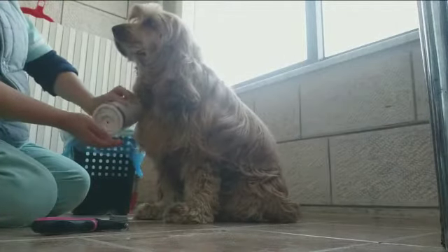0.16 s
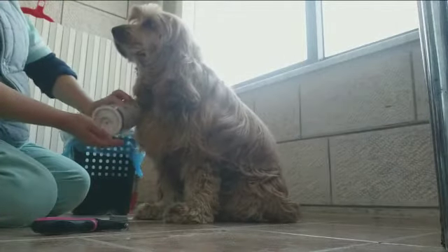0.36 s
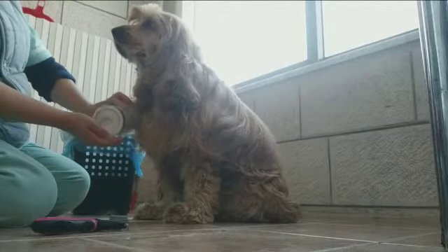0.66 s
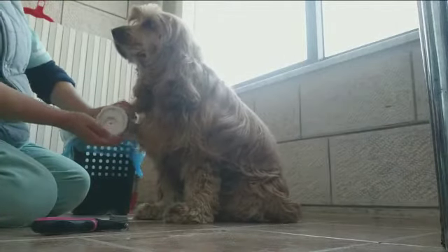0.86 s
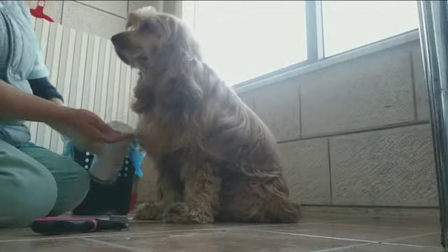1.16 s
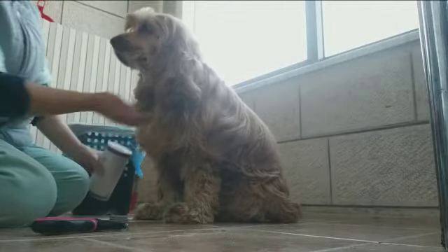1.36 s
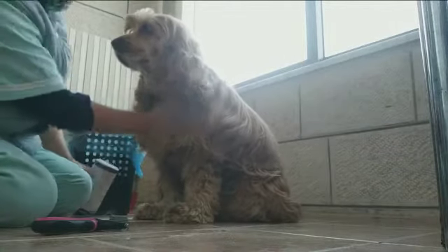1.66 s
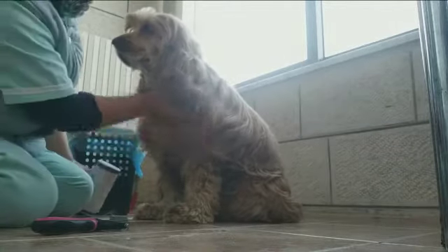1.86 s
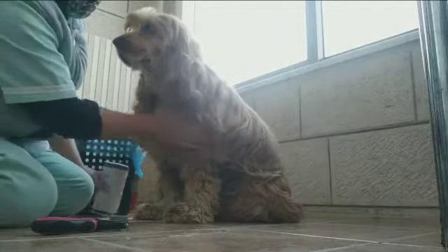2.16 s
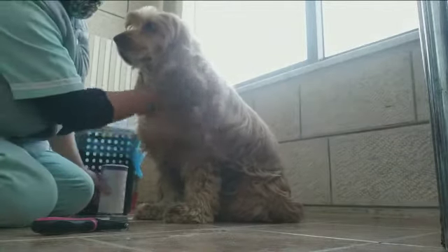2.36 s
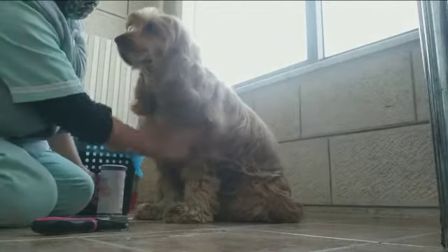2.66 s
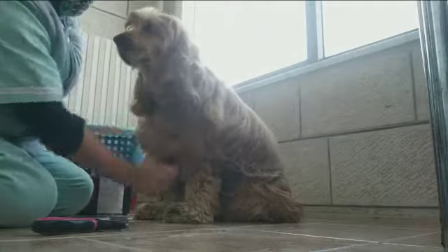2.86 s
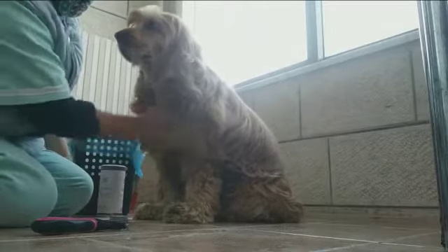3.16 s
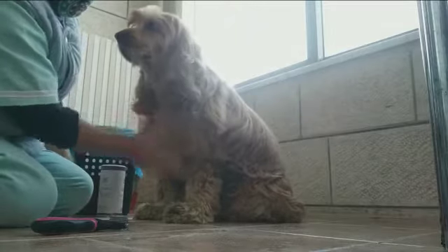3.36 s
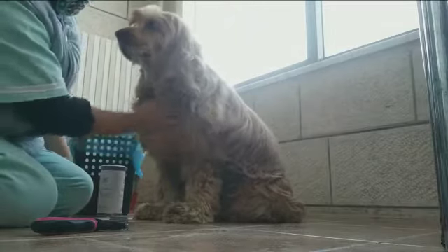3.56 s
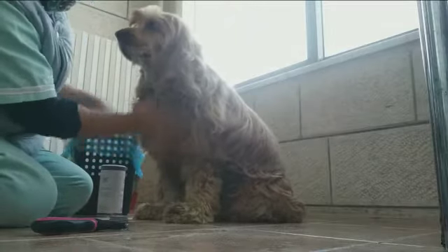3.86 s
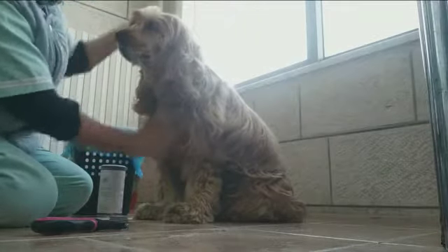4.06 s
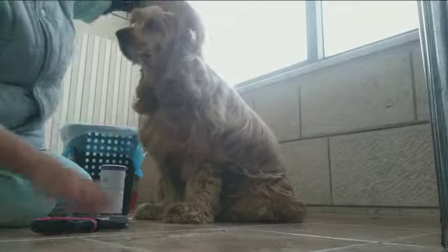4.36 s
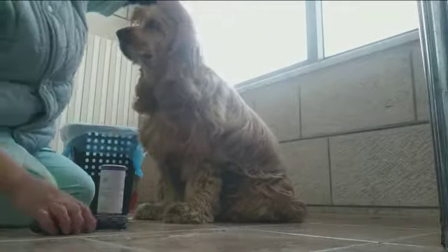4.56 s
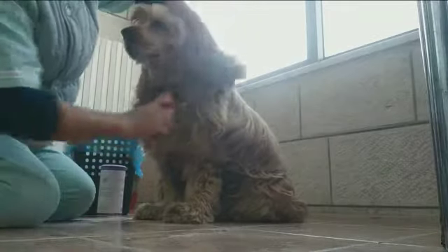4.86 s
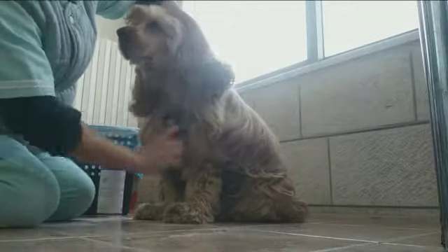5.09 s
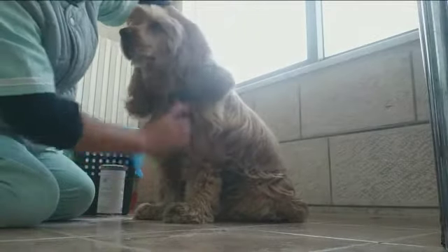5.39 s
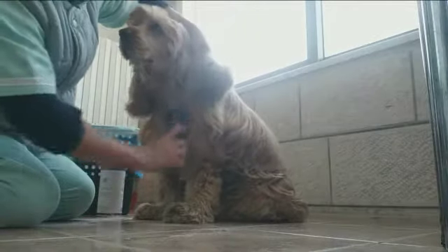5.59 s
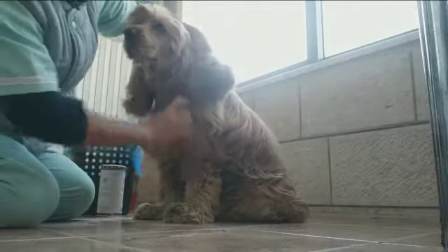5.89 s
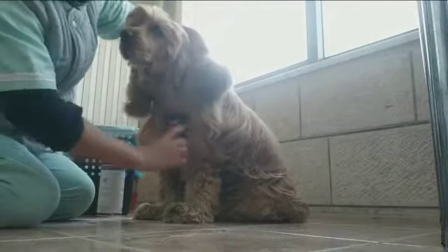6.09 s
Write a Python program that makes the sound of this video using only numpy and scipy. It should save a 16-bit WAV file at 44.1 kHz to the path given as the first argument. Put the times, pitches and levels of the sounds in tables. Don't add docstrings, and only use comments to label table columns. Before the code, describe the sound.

Quiet dog grooming, heard by a close microphone over a low distant engine hum. First come soft puffs of powder against a lid, then cloth rustle, then one strong hollow knock with quick bounces, by far the loudest event. Boomy bumps and friction follow, with smaller knocks. Later there are faint rubs, a brush picked up with a light clatter, and scratchy strokes through hair.

```python
import sys
import numpy as np
from scipy import signal
from scipy.fft import rfft, irfft, next_fast_len
from scipy.io import wavfile

SR = 44100
rng = np.random.default_rng(int(sys.argv[2]) if len(sys.argv) > 2 else 0)


def boost(x):
    u = np.asarray(x, float) / 20
    return 10 ** u


def wrap_up_sound(samples):
    columns = np.atleast_2d(samples).T
    tamed = np.clip(columns, -1, 1)
    steps = np.round(tamed * 32767).astype(np.int16)
    wavfile.write(sys.argv[1], SR, steps)


N = 274743
HZ = np.maximum(np.fft.rfftfreq(N, 1 / SR), 1)

# frequency_hz, density_db (per Hz)
ROOM_TONE = [(20, -23.5), (45, -20.5), (64, -13), (108, -4), (200, -12), (335, -13.5), (430, -25.5),
             (620, -40), (800, -25), (1000, -34), (1500, -18), (2000, -28), (2300, -30), (8000, -41.5)]
ROOM_TONE_DB = -73.5
# time_s, hum_db
TRAFFIC = [(0.0, -63), (0.56, -63.5), (0.85, -70.5), (1.18, -65.5), (1.5, -67), (2.8, -69.5), (3.3, -66),
           (3.46, -74), (3.7, -68), (4.11, -70.5), (4.7, -68.5), (4.93, -79), (5.7, -73.5), (6.23, -70)]
# time_s, wash_db
TYRES = [(0.0, -77.5), (1.1, -76.5), (1.6, -74), (3.7, -77.5), (4.5, -73), (4.95, -77), (6.23, -75.5)]
# frequency_hz, width_hz, level_db
TRAFFIC_MODES = [(104, 11.3, 2), (142.1, 31.5, 1), (246, 66, -12), (320, 24, -5.5)]

# start_s, peak_db, thud_db, decay_s
SHAKES = [
    (0.0194, -67, -81, 0.16),
    (0.2024, -68, -88, 0.21),
    (0.3965, -67.5, -72, 0.19),
    (0.5764, -69, -77, 0.12),
    (0.75, -64.5, -67.5, 0.18),
    (1.1787, -68, -73, 1),
]
# frequency_hz, width_hz, level_db
TUB = [(1840, 500, 0), (3800, 300, -10), (8400, 1100, 3)]

# peak_s, level_db, length_s, dull_rub_db, heavy_fold_db
RUSTLE = [(0.0, -71.5, 0.083, -8, -1.5), (0.208, -72, 0.073, -23, -24), (0.423, -91, 0.33, -12, 12.5),
          (0.582, -73, 0.14, -2.5, -3.5), (0.763, -94.5, 0.1, 16, 17), (1.202, -72.5, 0.17, -6, -16),
          (1.422, -58.5, 0.31, -5, -9.5), (1.501, -60.5, 0.16, -0.5, -6), (1.69, -69.5, 0.3, 0, -9),
          (2.62, -75.5, 0.65, -10, -18), (2.722, -81, 0.34, -1.5, -15), (2.882, -77, 0.15, 0, -15),
          (3.106, -73.5, 0.21, 0, 1), (3.224, -69.5, 0.14, -18, -20), (3.651, -70, 0.18, -8.5, -6.5),
          (3.826, -94.5, 0.17, 20, 17.5), (4.05, -75.5, 0.32, -6, -13), (4.213, -71.5, 0.82, -1.5, -7),
          (4.332, -75, 0.34, 2, -13), (4.444, -72, 0.1, 0, -13), (5.69, -85.5, 0.37, 5.5, 6),
          (6.057, -81.5, 0.29, 5.5, -3)]
# frequency_hz, density_db (per Hz)
CLOTH = [(1500, -22), (2500, -11.5), (3100, -9), (3700, -6), (4500, -9.5), (5800, -11), (7200, -10),
         (8500, -8.5), (10000, -15.5), (15500, -14)]
# frequency_hz, density_db (per Hz)
RUB = [(900, -32), (1400, 0.5), (1900, 2.5), (2250, -1), (2600, 0.5), (3000, -15.5), (4500, -36)]
RUSTLE_RISE, RUSTLE_ROUND = 0.63, 1.23

# start_s, peak_db,
# pitch_hz, rise_s, decay_s
TOUCHES = [(0.001, -66, 297, 0.033, 0.34), (0.202, -61.5, 320, 0.012, 0.16), (0.218, -63, 212, 0.016, 0.5),
           (0.2, -63.5, 269, 0.019, 0.19), (0.577, -61.5, 1950, .001, 0.067),
           (0.59, -59.5, 286, 0.0062, 0.16), (0.61, -60, 225, 0.012, 0.18),
           (1.185, -68, 4060, 0.0049, 0.15), (1.4, -60, 2290, .04, .4), (1.44, -62, 5200, 0.035, .3),
           (1.83, -64.5, 1950, 0.024, 0.46), (1.959, -60, 1840, 0.031, 0.39),
           (2.19, -52, 2680, .006, 0.071), (2.194, -50, 2160, .004, .06), (2.42, -53.5, 1310, .01, 0.24),
           (2.5, -62, 896, 0.023, 0.28), (3.063, -64, 806, 0.035, 0.31), (3.202, -77, 3430, 0.014, .1),
           (3.632, -75, 3600, 0.015, 0.078), (3.812, -80, 2030, 0.0018, 0.12)]
# start_s, peak_db, pitch_hz, rise_s, decay_s
BRUSH_TOUCHES = [(4.19, -62.5, 2030, 0.025, .35), (4.26, -73, 8150, .04, .5), (4.29, -70, 2020, .025, .25),
                 (4.335, -65, 1820, .015, .2), (4.42, -71, 12100, .02, 0.26),
                 (4.476, -68, 1200, 0.0095, .3), (4.546, -59.5, 1870, 0.016, .16),
                 (4.634, -63, 14300, .002, .2), (5.035, -61.5, 4360, 0.0089, 0.24),
                 (5.12, -66, 3500, 0.02, 0.18), (5.545, -58.5, 6600, 0.0061, 0.16),
                 (5.6, -61, 3500, .01, .12), (5.66, -41, 6470, 0.00083, 0.023),
                 (5.69, -64, 1400, 0.018, .3), (5.775, -64, 8400, 0.0082, 0.088),
                 (6.012, -74, 5160, 0.007, .12), (6.016, -62, 8100, .006, .1), (6.04, -63, 6900, .03, .3)]

# start_s, peak_db, crack_db, sharp_edge_db
KNOCKS = [
    (1.703, -22.5, -29, -36),
    (1.718, -16.5, -40, -39),
    (1.735, -21, -42, -55),
    (1.741, -24, -85, -46),
    (1.748, -38, -55, -64),
    (2.164, -56, -54, -54),
    (2.193, -34, -67, -65),
    (2.356, -58, -54, -73),
    (2.392, -34.5, -37.5, -60),
    (2.406, -31, -64, -83),
]
# frequency_hz, density_db (per Hz)
KNOCK_COLOUR = [(40, -45), (70, -16), (140, -9.5), (250, -9), (400, -10.5), (600, -5), (1000, -11),
                (1300, -29), (1900, -21.5), (2500, -26), (4200, -38.5), (5500, -42.5), (11000, -45),
                (16000, -47)]
# frequency_hz, t60_s
KNOCK_TAIL = [(80, 1), (250, 0.5), (700, 0.35), (2000, 0.21), (6000, 0.25), (14000, 0.072)]
# frequency_hz, width_hz, level_db
KNUCKLE = [(723, 166, -1.5), (2076, 420, -9), (3750, 400, -18)]
KNUCKLE_CUT_HZ = 3800

# start_s, peak_db, pitch_hz
BUMPS = [(1.7595, -37, 750), (1.772, -42, 694), (1.778, -35, 480), (1.796, -44, 590), (1.807, -42, 694),
         (1.826, -39, 600), (1.84, -47, 248), (1.885, -50, 199), (1.917, -45, 216), (1.945, -43, 217),
         (1.975, -41, 230), (1.965, -40, 215), (1.993, -41.5, 215), (2.004, -34, 219), (2.034, -45, 213),
         (2.049, -35.5, 213), (2.066, -42, 230), (2.088, -34.5, 203), (2.098, -45, 215), (2.113, -47, 178),
         (2.125, -45.5, 190), (2.14, -38, 257), (2.162, -33.5, 200), (2.184, -34, 215), (2.193, -31.5, 238),
         (2.205, -29, 232), (2.214, -35, 207), (2.234, -33, 238), (2.248, -29.5, 201), (2.264, -36.5, 242),
         (2.284, -44, 215), (2.304, -38, 201), (2.319, -38, 217), (2.341, -38, 189), (2.37, -44, 213),
         (2.386, -39, 214), (2.407, -34, 790), (2.418, -48, 500), (2.436, -40, 400)]
BUMP_CYCLES, BUMP_SOFTNESS = 9.7, 0.9

# time_s, boom_db
DRAG = [(1.78, -64), (1.85, -44.5), (1.98, -42.5), (2.12, -43.5), (2.206, -37), (2.31, -42), (2.45, -43),
        (2.6, -61), (2.9, -80)]
# peak_s, body_db, rattle_db, rise_s, fall_s
JERKS = [(1.779, -48.5, -67, .03, 0.2), (1.986, -52, -87, 0.041, 0.22), (2.2, -45.5, -50.5, 0.072, 0.1),
         (2.243, -46, -58.5, 0.12, 0.12), (2.36, -68, -70, .02, .05), (2.411, -47, -62.5, 0.058, 0.15),
         (2.04, -54, -70, 0.05, 0.16), (2.11, -67, -64.5, 0.072, 0.18)]
# frequency_hz, width_hz, level_db
PANEL = [(104, 44, -13.5), (135.4, 8.5, 1), (179.7, 25, -3.5), (212, 34, 2), (246, 88, -0.5),
         (459, 35.5, -0.5), (494, 93, -5.5), (619, 32, -8), (730, 67, -7.5), (858, 51, -8.5),
         (970, 26, -8.5)]
# frequency_hz, width_hz, level_db
RUNNER = [(1680, 110, 6), (2060, 260, 6.5), (2200, 250, 8), (2610, 150, 9), (2760, 280, 2), (3110, 130, 4)]
# frequency_hz, density_db (per Hz)
SCRAPE = [(1940, -34), (3300, -9), (3900, 0), (4620, -8), (5340, -2), (6500, -3), (7500, -4.5), (8590, -6),
          (12400, -10), (14000, -19)]
BODY_DB, RATTLE_DB, SCRAPE_DB = -13.5, -31.5, -35.5
JERK_BOOM_DB, JERK_SCRAPE_DB = -1, -8.5
EASY_DB, HARDER = -37, 2
MURMUR_DB = -6

# peak_s, level_db, handle_db (against the level)
LIFTS = [
    (4.479, -62.5, 0),
    (4.556, -51, -1),
]
# landing_s, landing_db, hardest_pull_s, pull_db, let_go_s
STROKES = [
    (5.037, -58, 5.185, -56.5, 0.1),
    (5.55, -60.5, 5.62, -58.5, 0.16),
    (5.6, -69, 5.685, -64, 0.15),
    (5.76, -69, 5.79, -86, 0.092),
    (6.02, -56, 6.145, -58.5, .11),
]
# start_s, peak_db, pins_db, thud_db, frame_db
TICKS = [(4.473, -67, -48, -56, -62), (4.4982, -70, -48, -61, -65.5), (4.5437, -48, -44, -59, -62),
         (4.564, -41, -59, -61, -71), (5.147, -50.5, -55, -88, -85), (5.198, -61, -44, -76, -86),
         (5.659, -46.5, -48, -69.5, -83), (4.556, -50, -49, -75, -68), (4.578, -53, -56, -75, -72),
         (5.121, -70, -52, -85, -85), (5.165, -70, -59, -87, -85), (5.177, -70, -61, -85, -87),
         (5.21, -72, -55, -88, -85), (5.238, -63, -65, -88, -91), (5.6, -63, -52, -83, -83),
         (5.617, -52, -54, -82, -85), (6.096, -70, -51, -85, -85), (6.133, -58, -57, -85, -87),
         (6.15, -61, -61, -85, -91)]
# start_s, peak_db, decay_s
SWISH = [
    (4.633, -58, 0.31),
    (4.67, -61, .2),
    (5.66, -55, .03),
]
# frequency_hz, width_hz, level_db
HANDLE = [(1196, 130, -8), (1842, 54, 4.5), (1945, 105, 0.5), (2080, 170, -3)]
# frequency_hz, width_hz, level_db
PINS = [(3480, 170, -15), (5200, 250, -13), (6470, 120, -5), (6900, 260, -7), (7750, 160, -11),
        (8940, 280, -11), (10250, 170, -11), (11000, 150, -13), (11950, 160, -4), (12280, 150, 0),
        (12600, 160, -10), (12950, 200, -15), (14200, 120, -16)]
# frequency_hz, width_hz, level_db
FRAME = [(1200, 36, 7), (2830, 71, 4), (3500, 220, -11), (4270, 300, -2.5), (5140, 100, 7.5),
         (5400, 220, -8), (5800, 150, -6), (6450, 180, -6), (7760, 200, -2), (8340, 150, -1),
         (9600, 200, -6)]
# frequency_hz, density_db (per Hz)
HAIR = [(1500, -40), (2600, -11), (3500, -13), (4400, -8), (5800, -4.5), (6900, -4.5), (7400, -4),
        (9500, -4.5), (12800, 0.5), (13600, -19), (15500, -8)]
LANDING_RISE_S, LANDING_FALL_S, PULL_RISE_S = 0.039, 0.16, 0.19
PULL_HANDLE_DB, PULL_HAIR_DB, HAIR_LINGERS = -5.5, -4, 1.2
LANDING_PINS_DB = -5.5
LIFT_RISE_S, LIFT_HANDLE_S, LIFT_PINS_S, LIFT_HAIR_S = 0.035, 0.14, 0.11, 0.25

ROOM_T60_S, ROOM_DB = 0.21, -14.5
# frequency_hz, width_hz, level_db
HOUSING = [(1950, 370, -41), (2200, 1000, -15)]
# frequency_hz, width_hz, level_db (each pass)
LEFT_PORT = [(9530, 1800, -4)]
# frequency_hz, width_hz, level_db (each pass)
RIGHT_PORT = [(1880, 640, -0.63)]
HISS_DB, CUTOFF_HZ = -78, 15780


def rms_one(x):
    return x / np.sqrt(np.mean(x ** 2) + 1e-20)


def in_time(rows):
    s, db = np.transpose(rows)
    return np.interp(np.arange(N) / SR, s, db)


def at_hz(points, hz):
    table_hz, values = np.array(points).T
    return np.interp(np.log(hz), np.log(table_hz), values)


def colour(x, spectrum):
    return rms_one(irfft(rfft(x) * boost(at_hz(spectrum, HZ)), N))


def band_of(x, low_hz, high_hz):
    return signal.sosfilt(signal.butter(2, [low_hz, high_hz], "band", fs=SR, output="sos"), x)


def drift(rate):
    r = np.exp(-2 * np.pi * rate / SR)
    white = rng.standard_normal(N + SR)
    return rms_one(signal.lfilter([1], [1, -2 * r, r * r], white)[SR:])


def grains(per_s, spread_db):
    sizes = boost(spread_db * np.minimum(rng.exponential(1, N), 5)) * rng.choice([-1, 1], N)
    return sizes * (rng.random(N) < per_s / SR) + 1e-18


def resonate(x, modes):
    out = 0
    for k, (hz, width, db) in enumerate(modes):
        r = np.exp(-np.pi * width / SR)
        top = (1 - r * r) / 2
        poles = [1, -2 * r * np.cos(2 * np.pi * hz / SR), r * r]
        out = out + (-1) ** k * boost(db) * signal.lfilter([top, 0, -top], poles, x)
    return out


def dying(times, dbs, t60, rise=0.00054):
    power = np.full(N, 1e-18)
    power[(np.array(times) * SR).astype(int)] = boost(2 * np.array(dbs))
    for pole in (boost(-120 / (t60 * SR)), np.exp(-1 / (rise * SR))):
        power = signal.lfilter([1], [1, -pole], power)
    return np.sqrt(power / (1 + rise * SR))


def swell(s, db, rise, fall, roundness=0.66):
    t = np.arange(0, N + 32, 32)[:, None] / SR - s
    far = np.where(t < 0, -t / rise, t / fall) ** roundness
    power = boost(np.maximum(2 * (db - 30 * far), -400))
    gain = np.sqrt(np.sum(power, axis=1))
    return np.interp(np.arange(N) / 32, np.arange(len(gain)), gain)


def patchy(x, patch_db, rate):
    edges = 1500 * 2 ** np.arange(0, 3.7, 1 / 3)
    out = 0
    for k, (low, high) in enumerate(zip(edges, edges[1:])):
        out = out + (-1) ** k * band_of(x, low, high) * boost(patch_db * drift(rate))
    return rms_one(out)


def struck(force, modes):
    plucks = grains(6000, 2.5)
    rung = 0
    for k, mode in enumerate(modes):
        rung = rung + (-1) ** k * resonate(force * plucks * boost(2.2 * drift(14)), [mode])
    return rung / np.std(resonate(plucks, modes))


def background():
    hiss = boost(ROOM_TONE_DB + 3.5) * colour(rng.standard_normal(N), ROOM_TONE)
    hiss = hiss - resonate(hiss, [(630, 450, -3)])
    hum = rms_one(resonate(resonate(rng.standard_normal(N), TRAFFIC_MODES), TRAFFIC_MODES))
    wash_spectrum = [(250, -12.0), (430, -3.0), (700, -4.5), (1000, -1.0), (1300, -6.0), (2500, -47)]
    wash = colour(rng.standard_normal(N), wash_spectrum)
    wander = boost(0.91 * drift(0.92) + 0.97 * drift(6.9))
    return hiss + boost(in_time(TRAFFIC)) * wander * hum + boost(in_time(TYRES)) * wash


def powder_tub():
    fine = rms_one(resonate(grains(6000, 2.3), TUB[1:]))
    thud = rms_one(resonate(grains(1600, 2.5), TUB[:1]))
    out = 0
    for s, db, thud_db, t60 in SHAKES:
        out = out + dying([s], [db - 4.5], t60, rise=0.012) * fine
        out = out + dying([s], [thud_db - 4], 0.069) * thud
    return out


def rustle():
    s, db, length, dull_db, fold_db = np.transpose(RUSTLE)
    bright, dull, fold = (swell(s, db + against_db, RUSTLE_RISE * length, length, RUSTLE_ROUND)
                          for against_db in (0, dull_db, fold_db))
    fibres = colour(grains(9000, 0.52), CLOTH)
    rub = grains(8000, 3.2)
    folds = colour(rub, [(400, -43), (700, 1.0), (1000, 4.0), (1300, -3.5), (1800, -51.0)])
    return bright * fibres + dull * colour(rub, RUB) + fold * folds


def touches():
    white = rng.standard_normal(N)
    out = 0
    for s, db, hz, rise, t60 in TOUCHES + BRUSH_TOUCHES:
        out = out + dying([s], [db - 1.5], t60, rise) * rms_one(resonate(white, [(hz, 0.074 * hz, 0)]))
    return out


def knocks():
    s, db, crack_db, edge_db = np.transpose(KNOCKS)
    white = rng.standard_normal((2, N))
    edges = 60 * 2 ** np.arange(0, 8.1, 1 / 3)
    out = 0
    for k, (low, high) in enumerate(zip(edges, edges[1:])):
        hz = np.sqrt(low * high)
        strength = db if hz < 1200 else crack_db + 19 if hz < 5000 else edge_db + 27.5
        level_db = strength + at_hz(KNOCK_COLOUR, hz) + 6
        envelope = dying(s, level_db, at_hz(KNOCK_TAIL, hz), rise=0.00058 + 0.23 / hz)
        out = out + band_of(white[k % 2], low, high) * envelope
    soften = signal.butter(2, KNUCKLE_CUT_HZ, fs=SR, output="sos")
    for mode, strength in zip(KNUCKLE, (db + 34, crack_db + 43.0, crack_db + 40.0)):
        clicks = np.full(N, 1e-18)
        clicks[((s + .0016) * SR).astype(int)] = boost(strength)
        soft = signal.sosfilt(soften, clicks)
        out = out + resonate(resonate(soft, [mode]), [(mode[0], 3 * mode[1], 0)])
    return out


def bumps():
    out = np.zeros(N)
    for s, db, hz in BUMPS:
        cycles = np.arange(int(.12 * SR)) * hz / SR
        decay = boost(db + 9.5 - 60 * cycles / BUMP_CYCLES)
        contact = 1 - np.exp(-cycles / BUMP_SOFTNESS)
        start = int(s * SR)
        out[start:start + len(cycles)] += decay * contact * np.sin(2 * np.pi * cycles)
    return out


def drag_forces():
    before, after = (DRAG[0][0] - .06, -120), (DRAG[-1][0] + .1, -120)
    effort_db = in_time([before] + DRAG + [after])
    upper_db = EASY_DB + HARDER * (effort_db - EASY_DB)
    s, body_db, rattle_db, rise, fall = np.transpose(JERKS)
    layers = [(effort_db, body_db + JERK_BOOM_DB),
              (upper_db + BODY_DB, body_db),
              (upper_db + RATTLE_DB, rattle_db),
              (upper_db + SCRAPE_DB, rattle_db + JERK_SCRAPE_DB)]
    return [np.hypot(boost(steady_db), swell(s, jerk_db, rise, fall, 1.29)) for steady_db, jerk_db in layers]


def drag():
    boom, body, rattle, scrape = drag_forces()
    slips = grains(700, 2.6)
    low = rms_one(resonate(resonate(slips, PANEL[:5]), [(198, 250, 0)]))
    finer_slips = slips + 1.56 * grains(1600, 2.66)
    mid = rms_one(resonate(resonate(finer_slips, PANEL[5:]), [(810, 2000, 0)]))
    grit = grains(3000, 2.3)
    runner = rms_one(resonate(resonate(grit, RUNNER), [(2480, 1400, 0)]))
    scraping = patchy(colour(grit, SCRAPE), patch_db=2.4, rate=40)
    return boost(MURMUR_DB) * boom * low + body * mid + rattle * runner + scrape * scraping


def brush_forces():
    lands, land_db, pull, pull_db, let_go = np.transpose(STROKES)
    s, db, handle_db = np.transpose(LIFTS)
    in_coat = np.minimum(swell(lands, 0, LANDING_RISE_S, .4, 6), 1)
    landing = swell(lands, land_db, LANDING_RISE_S, LANDING_FALL_S, 0.99)
    handle_pull = swell(pull, pull_db + PULL_HANDLE_DB, 0.9 * PULL_RISE_S, let_go, 1.25)
    pins_pull = swell(pull, pull_db, PULL_RISE_S, let_go, 0.9)
    hair_pull = swell(pull, pull_db + PULL_HAIR_DB, 1.1 * PULL_RISE_S, HAIR_LINGERS * let_go, 1.44)
    handle = np.hypot(in_coat * handle_pull, swell(s, db + handle_db, LIFT_RISE_S, LIFT_HANDLE_S))
    pins = np.hypot(in_coat * pins_pull, swell(s, db, LIFT_RISE_S, LIFT_PINS_S))
    hair = np.hypot(in_coat * hair_pull, swell(s, db, LIFT_RISE_S, LIFT_HAIR_S))
    return handle, np.hypot(pins, boost(LANDING_PINS_DB) * landing), np.hypot(hair, landing)


def loose_hair():
    thin_spectrum = [(5000, -26), (9000, -13), (12500, -7), (14000, -8), (16000, -3)]
    thin = colour(rng.standard_normal(N), thin_spectrum)
    return sum(dying([s], [db], t60, rise=.003) for s, db, t60 in SWISH) * thin


def brush():
    handle, pins, hair = brush_forces()
    s, db, pins_db, thud_db, frame_db = np.transpose(TICKS)
    handle = np.hypot(handle, dying(s, db - 1.0, 0.016))
    pins = np.hypot(pins * boost(-1.5), dying(s, pins_db - 5.5, 0.027))
    hair = np.hypot(hair * boost(-1.0), dying(s, pins_db - 19, 0.0091))
    frame = dying(s, frame_db + 4.0, 0.18, rise=.003)
    ringing = struck(handle, HANDLE) + struck(pins, PINS) + struck(frame, FRAME)
    thud = struck(dying(s, thud_db - 6.0, 0.36, rise=0.0047), [(273, 33, 1.5), (656, 260, -7)])
    hissing = patchy(colour(grains(16000, 2.9), HAIR), patch_db=2.6, rate=52)
    return ringing + thud + hair * hissing + loose_hair()


def tiles(x):
    size = next_fast_len(N + SR)
    hz = np.fft.rfftfreq(size, 1 / SR)[:, None]
    delays_s = rng.uniform(.009, .028, 8)
    loop = np.exp(-2j * np.pi * hz * delays_s) * boost(-60 * 0.024 / ROOM_T60_S)
    echoes = np.sum(loop / (1 - loop), axis=1)
    return irfft(rfft(x, size) * echoes, size)[:N]


def scene():
    near = powder_tub() + rustle() + touches() + knocks() + bumps() + drag() + brush()
    field = background() + near + boost(ROOM_DB) * tiles(near)
    field = field + resonate(field, HOUSING)
    return np.array([field + resonate(resonate(field, port), port) for port in (LEFT_PORT, RIGHT_PORT)])


def band_limit(x):
    return signal.sosfilt(signal.butter(12, 16320, fs=SR, output="sos"), x)


def record(dry):
    rounded = .12 * np.tanh(dry / .12)
    wet = rounded + boost(HISS_DB) * rng.standard_normal(dry.shape)
    wet = signal.sosfilt(signal.cheby2(16, 50, CUTOFF_HZ, fs=SR, output="sos"), wet)
    return band_limit(wet)


dry = scene()
out = record(dry)
wrap_up_sound(out)
```